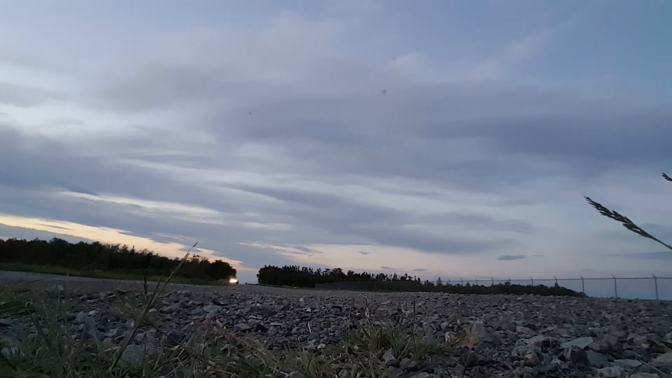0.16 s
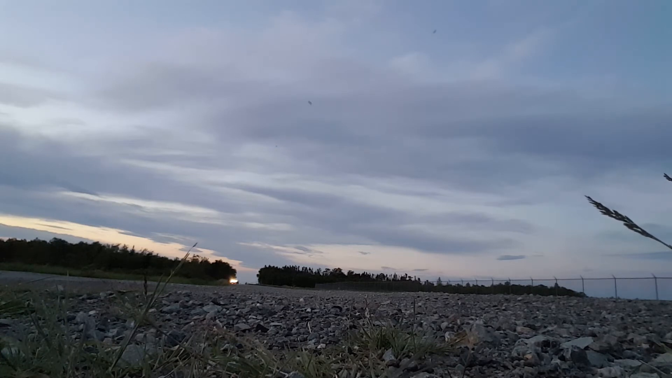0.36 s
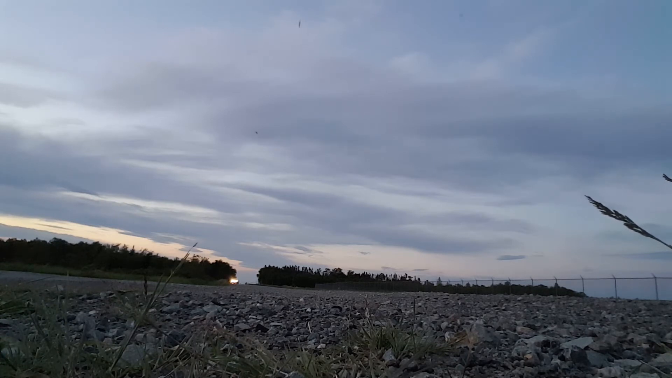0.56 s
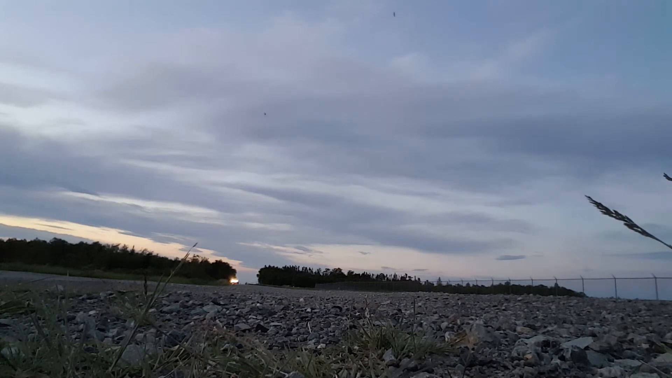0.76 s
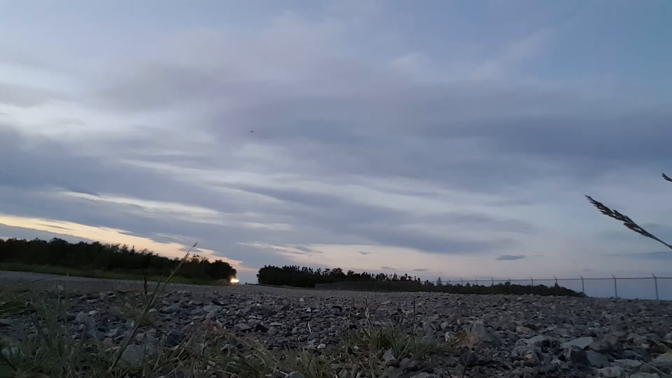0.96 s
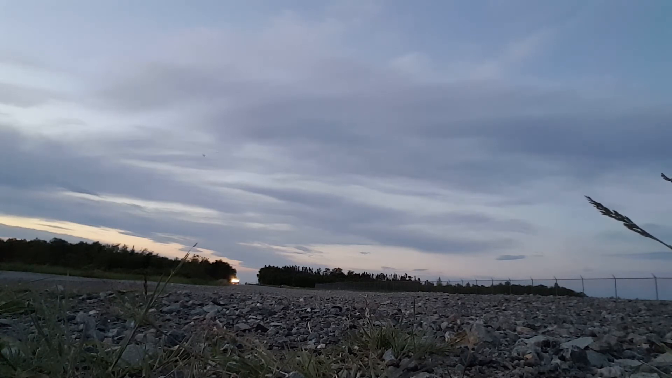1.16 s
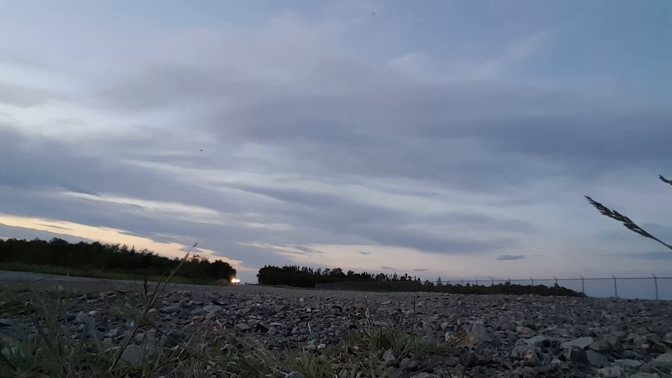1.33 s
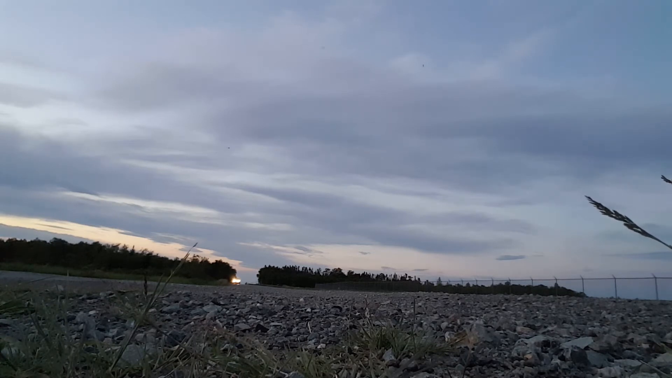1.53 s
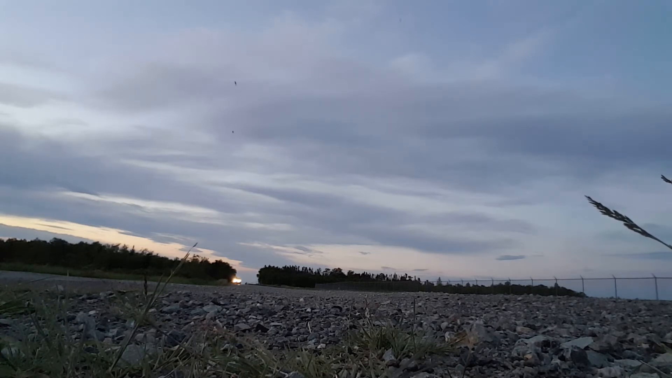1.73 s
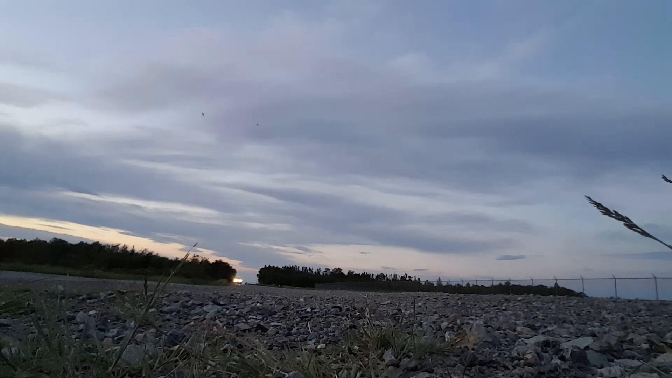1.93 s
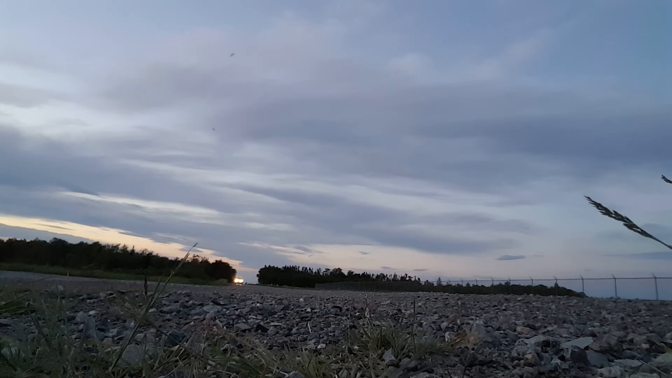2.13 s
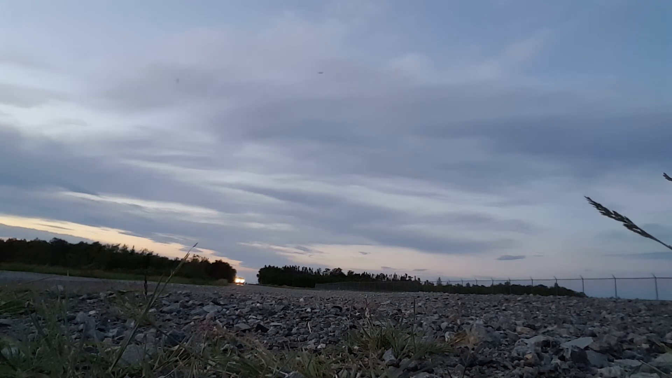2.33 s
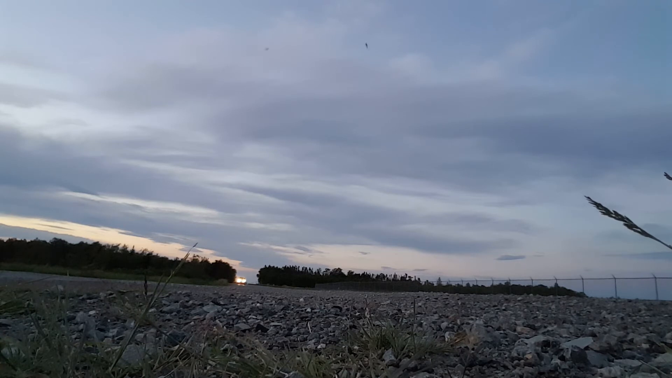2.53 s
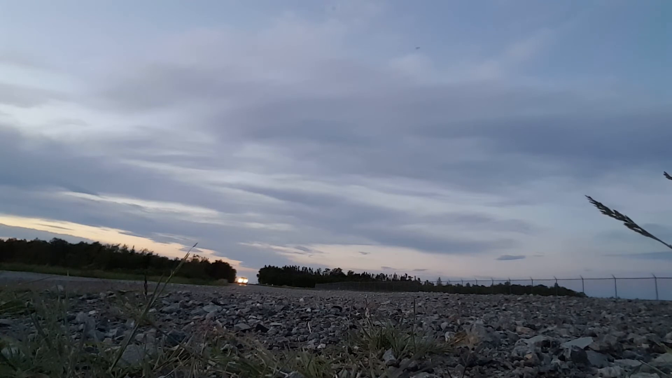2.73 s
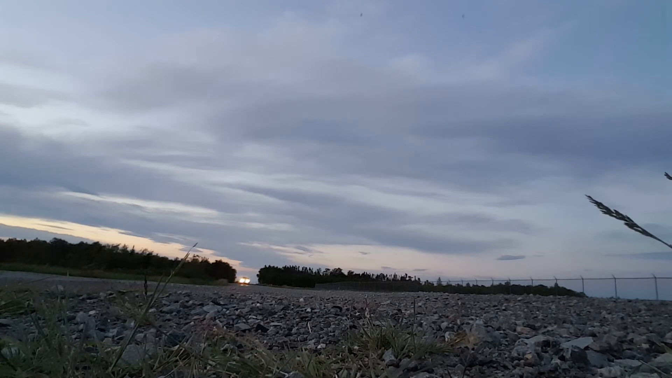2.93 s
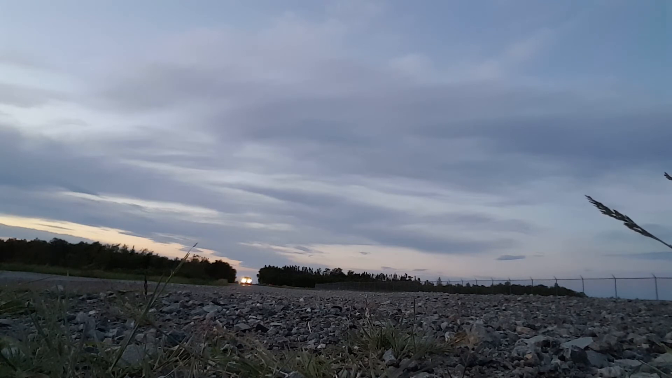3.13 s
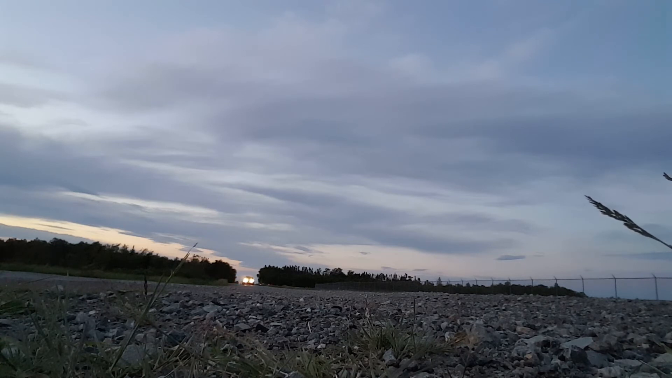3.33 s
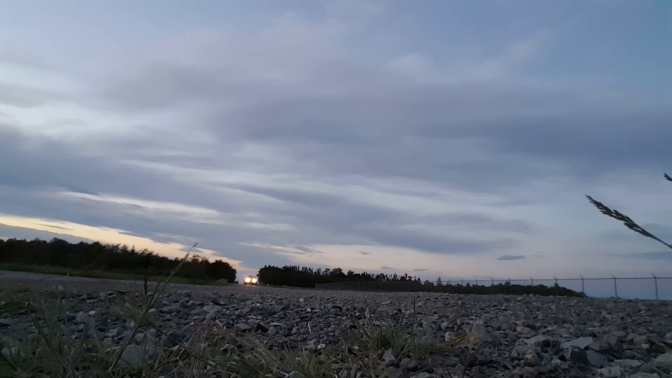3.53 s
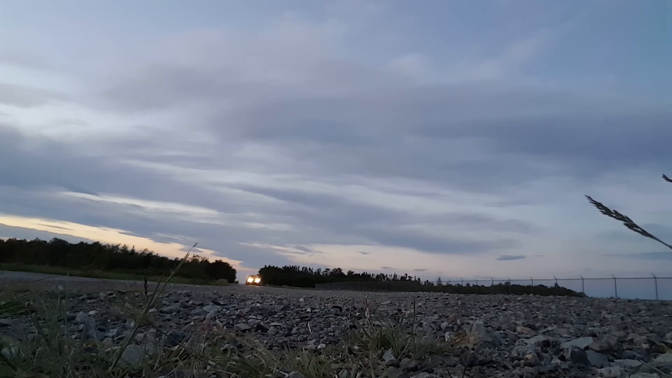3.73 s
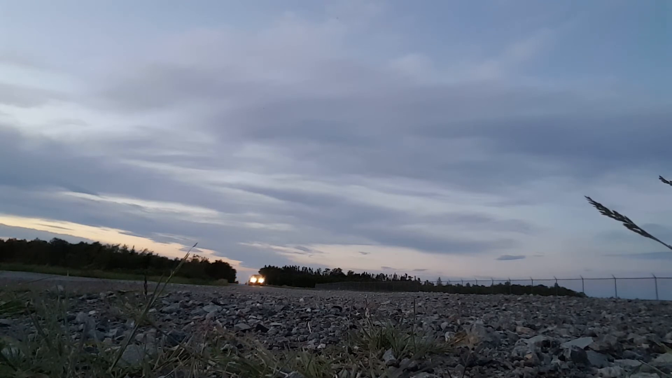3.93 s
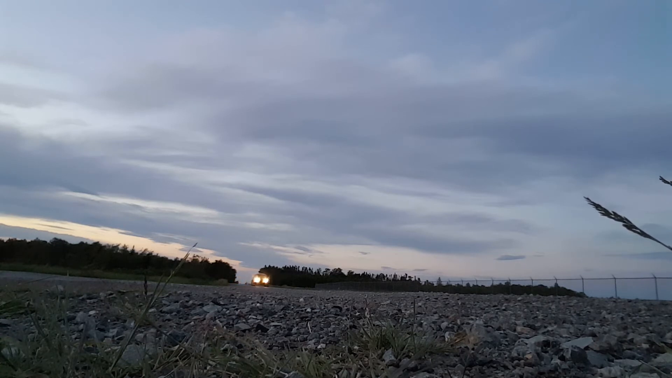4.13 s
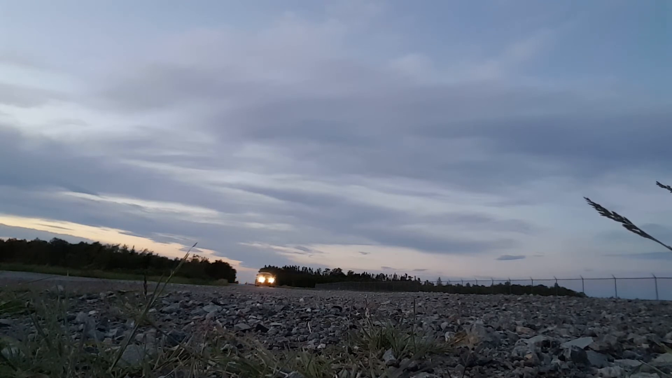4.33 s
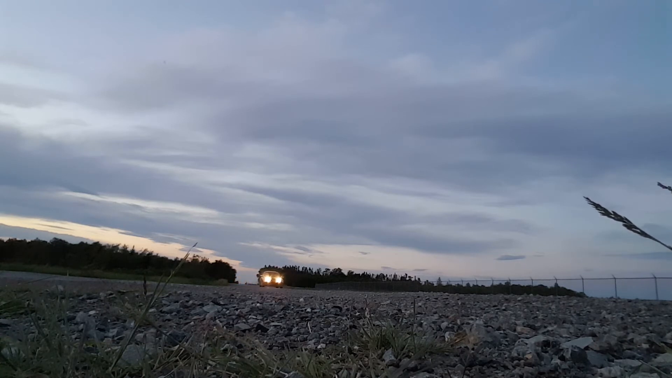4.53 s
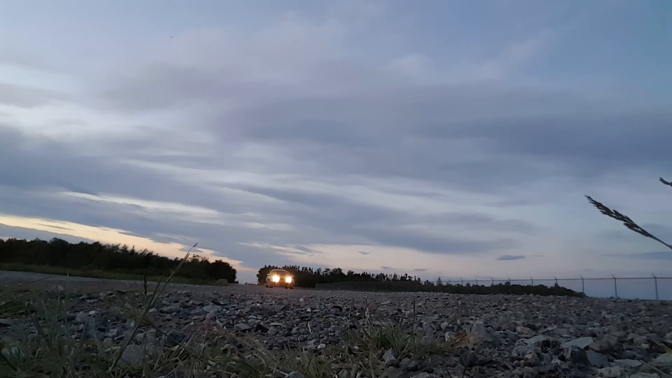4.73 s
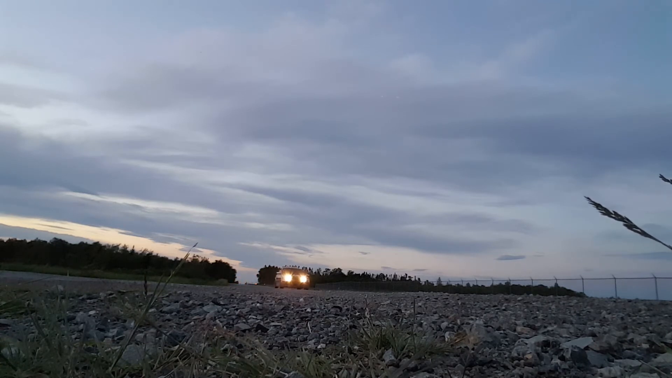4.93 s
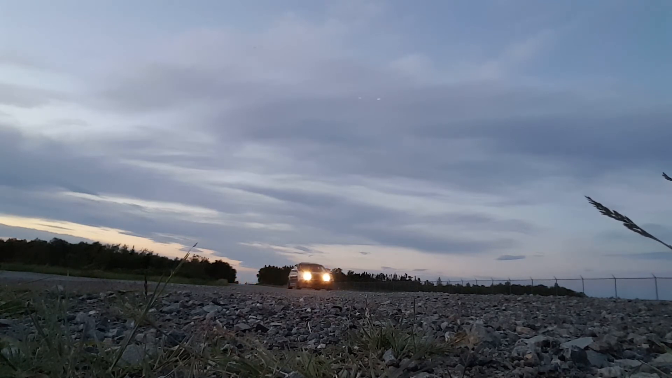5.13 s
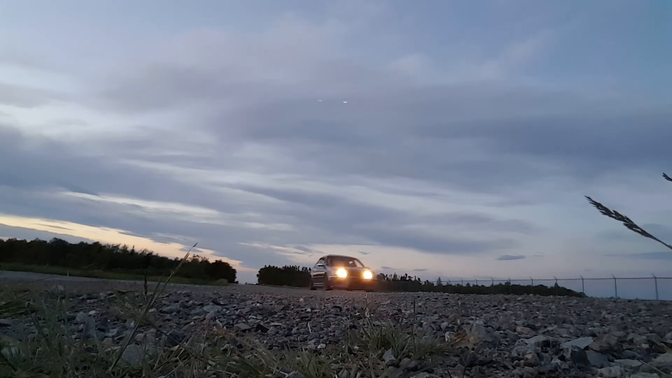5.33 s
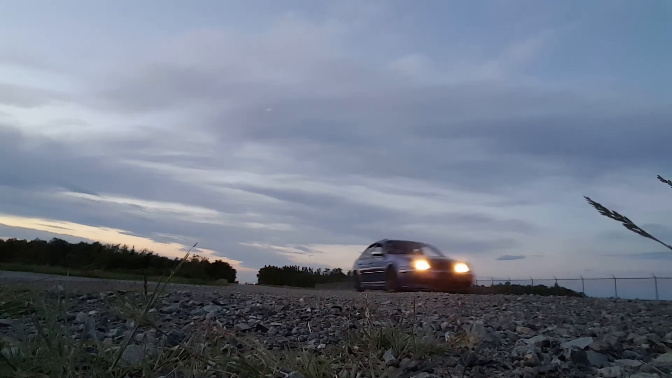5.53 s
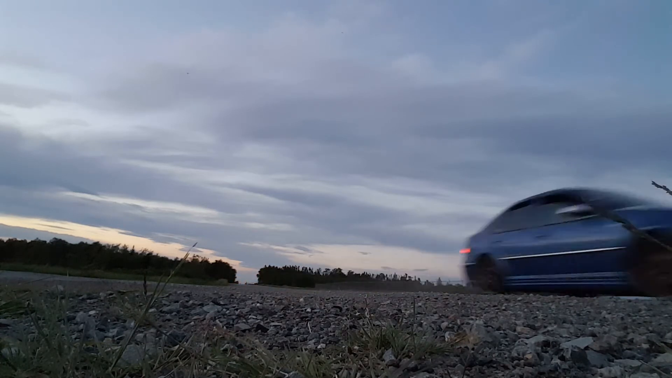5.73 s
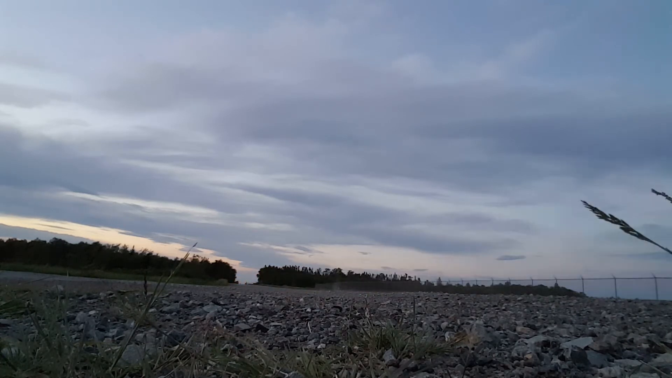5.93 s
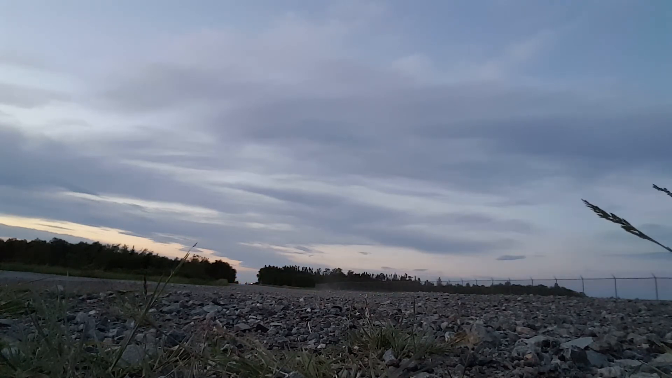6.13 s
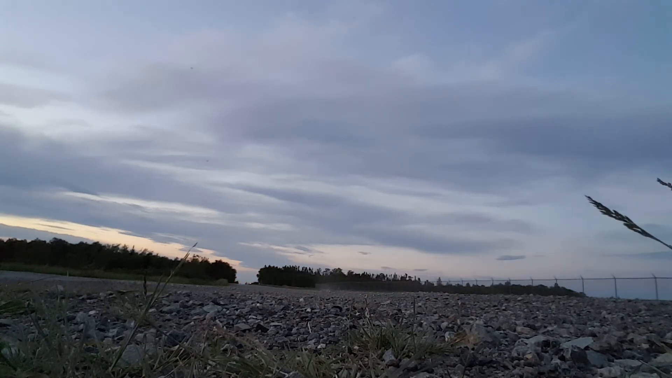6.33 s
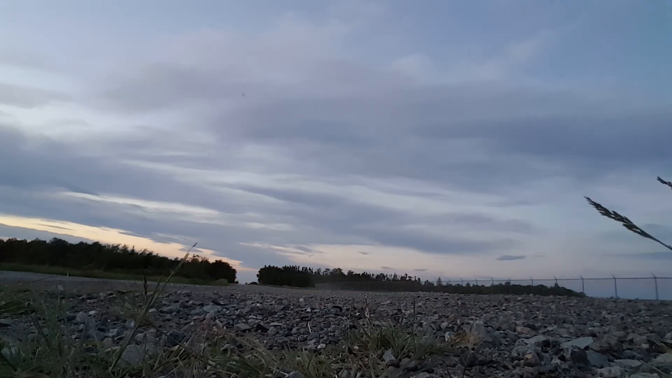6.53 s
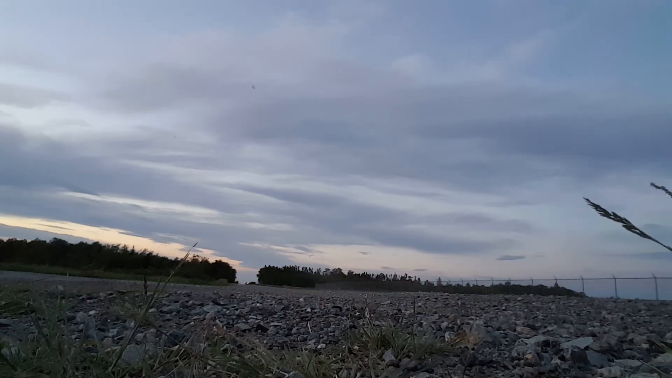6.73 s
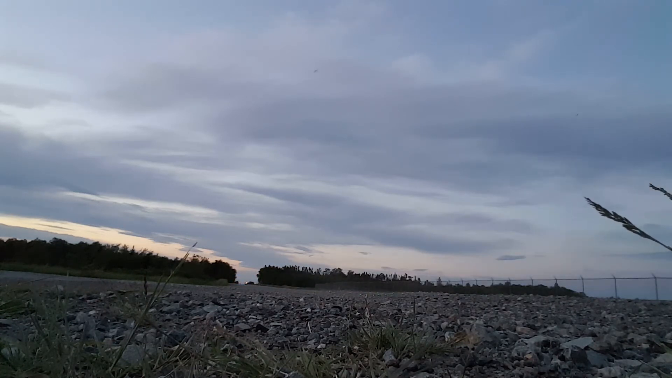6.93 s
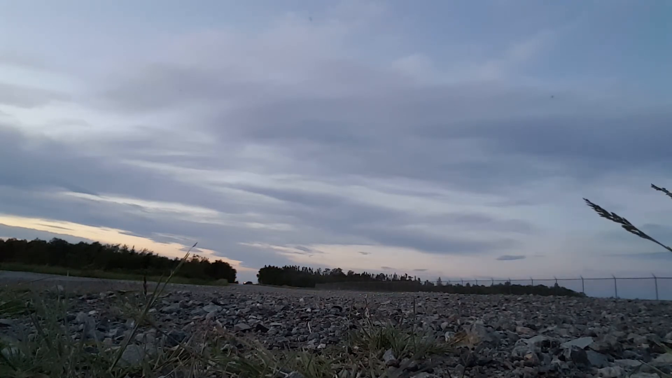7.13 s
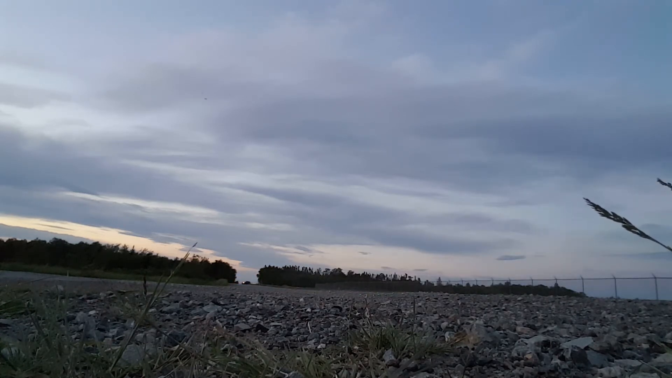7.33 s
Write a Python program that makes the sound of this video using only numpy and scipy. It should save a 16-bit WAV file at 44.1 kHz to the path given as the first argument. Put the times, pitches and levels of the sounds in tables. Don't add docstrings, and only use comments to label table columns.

```python
import sys
import numpy as np
from scipy import signal
from scipy.fft import rfft, irfft, next_fast_len
from scipy.io import wavfile
from scipy.ndimage import uniform_filter1d, map_coordinates

SR = 44100
rng = np.random.default_rng(int(sys.argv[2]) if len(sys.argv) > 2 else 0)


def master_out(mix):
    frames = np.transpose(np.atleast_2d(mix))
    ceiling = np.clip(frames, -1, 1)
    pcm = np.round(ceiling * 32767).astype(np.int16)
    wavfile.write(sys.argv[1], SR, pcm)


def amplitude_ratio(level_db):
    exponent = np.asarray(level_db, float) / 20
    return 10 ** exponent


N = 324576
TIME = np.arange(N) / SR

# (time [s], rate [Hz])
FIRING_RATE = [(0, 133.7), (1.66, 174.7), (2.3, 195.8), (2.91, 218.2), (3.52, 236.5), (3.65, 227.4),
               (3.92, 213.1), (4.02, 187.5), (4.1, 165.5), (4.26, 170.9), (5.1, 184.7), (5.7, 195.3),
               (5.95, 188.1), (6.12, 176.1), (6.29, 168.8), (6.96, 154.5), (7.1, 131), (7.36, 136.1)]
# (time [s], firing tone level [dB], second order level [dB])
FIRING_TONES = [(0, -59.5, -68), (.5, -44.5, -56.5), (1.0, -43, -53), (1.4, -47, -47.5),
                (1.75, -52.5, -51.5), (2.05, -45, -56), (2.55, -42.5, -67.5), (2.85, -34.5, -54),
                (3.55, -29.5, -50), (3.92, -30.5, -49.5), (4.4, -31, -42.5), (5.15, -33.5, -33.5),
                (5.4, -25.5, -21), (5.9, -11, -19.5), (6.26, -22, -19.5), (6.55, -17.5, -25),
                (6.9, -21.5, -25.5), (7.36, -16.5, -20.5)]
# (multiple of firing rate, level over uneven-cylinder level [dB])
QUARTER_ORDERS = [(.5, -11), (.75, -6), (1.25, -11), (1.5, -9), (1.75, 0), (2.25, -12), (2.5, -5),
                  (2.75, -4), (3.25, -14), (3.5, -11), (3.75, -11), (4.25, -15), (4.5, -17), (4.75, -16)]
# (multiple of firing rate, level over uneven-cylinder level [dB])
UPPER_ORDERS = [(4, -6), (5, -11), (6, -15)]
# (frequency [Hz], gain [dB])
PIPE_COLOUR = [(100, -3), (230, -6), (335, 4), (405, -10), (490, 0), (620, -3), (700, 1), (800, 8),
               (950, -4), (1200, -10)]
# (time [s], order, gain [dB], half width [s])
ORDER_DIPS_AND_SWELLS = [(3.72, 1, -3, .08), (4.08, 1, -7, .06), (5.84, 1, -6, .02), (5.945, 1, -15, .015),
                         (6.03, 1, -9, .025), (6.34, 1, -9, .04), (5.885, 2, -25, .025), (5.9, 3, -18, .03),
                         (6.37, 2, 7, .06), (6.9, 2, 9, .05), (6.975, 2, -10, .015), (7.03, 2, 7, .04),
                         (7.03, 1, -5, .04), (1.0, 3, 6, .35), (1.62, 3, 9, .12)]
# (shuts at [s], opens at [s])
SHIFTS = [
    (3.55, 4.24),
    (6.318, 6.894),
]
# (time [s], length [s], thump level [dB], boom level [dB])
OVERRUNS = [
    (3.604, 0.077, -43.5, -37),
    (6.295, 0.21, -17.5, -27),
]
# (frequency [Hz], width [Hz], level [dB])
TAILPIPE_RINGS = [(80., 40., -8), (123., 30., 0), (250., 120., -11), (410., 180., -14)]
# (frequency [Hz], density [dB/Hz])
BOOM_SPECTRUM = [(20, -41.5), (35, -7.5), (60, -1), (110, 4), (180, 4.5), (280, -2), (400, -20)]
# (frequency [Hz], density [dB/Hz])
RUSH_SPECTRUM = [(150, -22), (250, -5), (400, -2.5), (600, -5), (800, -6), (1100, -13)]
# (frequency [Hz], density [dB/Hz])
ROAR_SPECTRUM = [(500, -34.5), (750, -3), (1000, 1.5), (1300, 3.5), (1600, -3), (1900, -16), (2400, -34.5)]
# (frequency [Hz], density [dB/Hz])
SIZZLE_SPECTRUM = [(1300, -23.5), (1700, 4), (2000, 3), (2500, -7), (3000, -27.5), (3600, -38), (4500, -41),
                   (5500, -44)]
# (frequency [Hz], density [dB/Hz])
TREAD_SPECTRUM = [(1900, -29), (2300, -2), (2700, 2), (3100, -9), (3500, -16), (4000, -30.5)]
# (frequency [Hz], density [dB/Hz])
GRIT_SPECTRUM = [(2400, -32.5), (2900, 5), (3300, -3), (3900, -9), (4600, -10), (5300, -12), (6000, -23)]
# (frequency [Hz], density [dB/Hz])
HISS_SPECTRUM = [(5000, -26.5), (5700, -4.5), (6500, -4), (7900, -1), (8500, -4.5), (9300, -10.5),
                 (10500, -38)]
# (frequency [Hz], density [dB/Hz])
AIR_SPECTRUM = [(5650, -41.5), (9600, -13.5), (10900, -6), (13500, -4), (14800, -4.5), (16000, -4.5)]
# (time [s], frequency [Hz], level [dB])
TURBO_WHISTLE = [(4.3, 11750, -95), (4.72, 12390, -82), (4.95, 12280, -84), (5.14, 12000, -80),
                 (5.3, 11520, -72), (5.57, 11530, -59), (5.78, 11330, -53), (5.9, 10860, -50),
                 (6.0, 10150, -55)]
# (time [s], level [dB])
GEAR_WHINE = [(4.7, -94), (5.2, -80), (5.45, -75), (5.6, -80)]
# (frequency [Hz], density [dB/Hz])
FIELD_SPECTRUM = [(1470, -36), (2500, 2), (2940, -0.5), (3410, -2), (6810, -10.5), (7130, -11.5),
                  (8730, -12), (10400, -12.5), (15200, -7.5), (16000, -19)]
# (time [s], lag of the left port [samples])
BEARING = [(0, 5.7), (2.7, 4.7), (4.5, 2.8), (5.44, 0), (5.7, -4.3), (5.8, -8.5), (5.88, -15.5),
           (5.96, -20.3), (6.15, -17.8), (6.27, -15), (6.42, -13.1), (6.7, -12.2), (7.36, -11.8)]

ABREAST_S, CAR_LENGTH_S, TAILPIPE_LATE_S = 5.83, .09, .07
KERB_S, TURN_S = 0.13, 0.41
FAR_DB_PER_S = 2
CREST_S, CREST_WIDTH_S, CREST_DB = 2.6, 0.42, -8
SHUT_S, OPEN_S, HEARD_AHEAD = .12, 0.25, .15
THUMP_RISE_S, THUMP_SAG_DB_PER_S, THUMP_FALL_DB_PER_S = .018, -34.5, -260
SHADE_DB_PER_SAMPLE = .42
WHINE_ORDER = 36.6


def exhaust():
    firings = np.cumsum(curves(FIRING_RATE)[0]) / SR
    puffs = 1 + 0.26 * np.cos(2 * np.pi * firings)
    rush_db = passing(5.88, -20.5, 0.43, 4.48, .3, .3, -9, -49)
    rush = noise(RUSH_SPECTRUM, 1.5, 14) * puffs * amplitude_ratio(rush_db)
    boom_gain = amplitude_ratio(passing(5.84, -24.5, 0.44, 5.6, -10, .3, -.1, -43.5))
    boom_gain += sum(amplitude_ratio(db) * overrun(s, 0.54 * length_s) for s, length_s, _, db in OVERRUNS)
    boom = noise(BOOM_SPECTRUM, 1.2, 10) * boom_gain
    return crank_orders(firings) + overrun_thumps(firings) + rush + boom


def crank_orders(firings):
    hz = curves(FIRING_RATE)[0]
    uneven_db = passing(6.01, -25.5, 0.72, 1.14, 8.43, -2.5, -22.5, -54, 0.11)
    shut = lifted() * (TIME > ABREAST_S)
    first_db, second_db = curves(FIRING_TONES)
    first_db = first_db - 12 * shut + dips_and_swells_db(1)
    second_db = second_db - 15 * shut + dips_and_swells_db(2)
    ring_db = 16 * gone(ABREAST_S) / (1 + ((3 * hz - 400) / 55) ** 2)
    third_db = uneven_db - 4 - 8 * shut + ring_db + dips_and_swells_db(3)
    third_db += (2.5 * walk(4) - 4) * (1 - gone(5.9))
    hidden_db = np.interp(TIME, [ABREAST_S - 1, ABREAST_S], [-4, 0])
    pipe_hz, pipe_gain_db = np.transpose(PIPE_COLOUR)

    def tone(multiple, db, waver_db, drift_rad, start=0):
        angle = 2 * np.pi * (multiple * firings + start) + drift_rad * walk(12)
        return np.sqrt(2) * amplitude_ratio(db + waver_db * walk(18)) * np.cos(angle)

    def weak_db(multiple):
        colour_db = np.interp(np.log(multiple * hz), np.log(pipe_hz), pipe_gain_db)
        tilt_db = np.clip(4 * (multiple - 3), -7, 3) * gone(ABREAST_S, .1)
        return uneven_db + colour_db + (multiple > 2) * hidden_db + tilt_db

    out = tone(1, first_db, .8, .1) + tone(2, second_db, .9, .15) + tone(3, third_db, 1.1, .2, .4)
    out += sum(tone(k, db + weak_db(k), 2.2, .35) for k, db in UPPER_ORDERS)
    out += sum(tone(k, db + weak_db(k), 3.2, .4, rng.random()) for k, db in QUARTER_ORDERS)
    return out


def dips_and_swells_db(order):
    return sum(db * np.exp(-((TIME - s) / width_s) ** 2)
               for s, which, db, width_s in ORDER_DIPS_AND_SWELLS if which == order)


def overrun_thumps(firings):
    cycles = [np.floor((firings - firings[int(row[0] * SR)]) / 4) for row in OVERRUNS]
    first_kicks, second_kicks = np.diff(cycles, prepend=0).clip(0, 1)
    kicks = np.where(TIME < 5, first_kicks, second_kicks) * amplitude_ratio(2.8 * walk(40))
    kicks = signal.oaconvolve(kicks, np.hanning(140), "same")
    thumps = sum(amplitude_ratio(db) * signal.lfilter(*signal.iirpeak(hz, hz / width_hz, SR), kicks)
                 for hz, width_hz, db in TAILPIPE_RINGS)
    gain = sum(amplitude_ratio(db) * overrun(s, length_s) for s, length_s, db, _ in OVERRUNS)
    return thumps / thumps.std() * gain


def overrun(at_s, length_s):
    dt = TIME - at_s
    db = THUMP_SAG_DB_PER_S * dt + THUMP_FALL_DB_PER_S * np.clip(dt - length_s, 0, None)
    return np.clip(dt / THUMP_RISE_S, 0, 1) * amplitude_ratio(np.minimum(db, 0))


def tyres(wheels):
    roar_db = passing(5.753, -15, 0.38, 6.89, -14, 7.8, -.1, -55.5)
    sizzle_db = passing(5.796, -19, 0.51, 12.6, -9.5, 1.4, -.1, -62)
    tread_db = passing(5.754, -32.5, 0.68, 24.0, -13, 1.3, -.1, -96)

    def roar():
        return noise(ROAR_SPECTRUM, 0.68, 27) * amplitude_ratio(roar_db)

    def sizzle():
        return noise(SIZZLE_SPECTRUM, 0.91, 20) * amplitude_ratio(sizzle_db) + noise(TREAD_SPECTRUM, 0.98, 25) * amplitude_ratio(tread_db)

    mid_pan_db = -.4 + 4 * gone(5.75)
    aimed = ports(roar(), mid_pan_db, wheels) + ports(sizzle(), .4 * mid_pan_db, wheels)
    scattered = np.array([roar() + sizzle(), roar() + sizzle()])
    wide = scattered_share()
    return np.sqrt(1 - wide) * aimed + np.sqrt(wide) * scattered


def spray(wheels, high_pan_db):
    vent_db = 3 * np.exp(-((TIME - SHIFTS[-1][0]) / .07) ** 2)
    grit_db = passing(5.91, -45, 0.82, 24.0, -8, 7., -3.7, -93.5)
    hiss_db = passing(5.9, -41, 1.375, 9.5, -19.5, 13.0, -2.2, -79.5) + vent_db
    air_db = passing(5.875, -43.0, 1.45, 9.5, -10.5, 3., -4, -88.5) + vent_db

    def treble():
        grit = noise(GRIT_SPECTRUM, 0.72, 30) * amplitude_ratio(grit_db)
        hiss = noise(HISS_SPECTRUM, 0.95, 27) * amplitude_ratio(hiss_db)
        return grit + hiss + noise(AIR_SPECTRUM, .8, 25) * amplitude_ratio(air_db)

    wide = scattered_share()
    aimed = ports(treble(), high_pan_db, wheels) * np.sqrt(.35 * (1 - wide))
    return aimed + np.sqrt(1 + wide) * np.array([treble(), treble()]) * shade(high_pan_db)


def turbo():
    whistle_gain = burst([(s, db) for s, _, db in TURBO_WHISTLE]) * amplitude_ratio(2.5 * walk(70) + 2 * walk(12) - 2)
    whistle_hz = curves(TURBO_WHISTLE)[0] * (1 + .002 * walk(40) + .012 * walk(500))
    whistle = whistle_gain * np.sin(2 * np.pi * np.cumsum(whistle_hz) / SR)
    whine_hz = WHINE_ORDER * curves(FIRING_RATE)[0] * (1 + .006 * walk(300))
    whine_gain = burst(GEAR_WHINE) * amplitude_ratio(2.5 * walk(40))
    whine = whine_gain * np.sin(2 * np.pi * np.cumsum(whine_hz) / SR)
    return np.sqrt(2) * (whistle + whine)


def field():
    return np.array([noise(FIELD_SPECTRUM, .3, 8), noise(FIELD_SPECTRUM, .3, 8)]) * amplitude_ratio(-75)


def passing(at_s, peak_db, spread, coming_db_s, behind_db, going_db_s, lift_db, far_db, turn_s=TURN_S):
    dt = TIME - at_s
    db = peak_db - spread * 10 * np.log10(1 + (dt / KERB_S) ** 2)
    db += dt * np.where(dt < 0, coming_db_s, going_db_s)
    db += behind_db * gone(at_s, turn_s) + lift_db * lifted()
    db += CREST_DB * (1 - np.tanh((TIME - CREST_S) / CREST_WIDTH_S)) / 2
    murmur_db = far_db + FAR_DB_PER_S * np.minimum(dt, 0)
    return 10 * np.log10(amplitude_ratio(2 * db) + amplitude_ratio(2 * murmur_db))


def gone(at_s, turn_s=TURN_S):
    return 1 - np.exp(-np.clip(TIME - at_s, 0, None) / turn_s)


def lifted():
    shut = sum(np.clip(np.minimum((TIME - shut_s) / SHUT_S, 1 - (TIME - open_s) / OPEN_S), 0, 1)
               for shut_s, open_s in SHIFTS)
    return shut * np.where(TIME < ABREAST_S, HEARD_AHEAD, 1)


def scattered_share():
    return .015 + .5 * np.exp(-((TIME - ABREAST_S) / CAR_LENGTH_S) ** 2)


def ports(x, pan_db, lag, order=3):
    pair = [map_coordinates(x, [np.arange(N) - side * lag / 2], order=order, mode="mirror") for side in (1, -1)]
    return np.array(pair) * shade(pan_db)


def shade(pan_db):
    return amplitude_ratio(np.array([pan_db, -pan_db]) / 2)


def noise(spectrum, flicker_db, rate_hz):
    hz, db = np.transpose(spectrum)
    size = next_fast_len(N, real=True)
    f = np.maximum(np.arange(size // 2 + 1) * SR / size, 1)
    gain = amplitude_ratio(np.interp(np.log(f), np.log(hz), db, left=-120, right=-120))
    x = irfft(rfft(rng.standard_normal(size)) * gain, size)[:N] * amplitude_ratio(flicker_db * walk(rate_hz))
    return x / x.std()


def walk(rate_hz):
    k = int(SR / rate_hz)
    held = np.repeat(rng.standard_normal(N // k + 1), k)
    w = uniform_filter1d(uniform_filter1d(held, k), k)[:N]
    return w / w.std()


def curves(table):
    s, *columns = np.transpose(table)
    return [np.interp(TIME, s, c) for c in columns]


def burst(table):
    edge = np.clip(np.minimum(TIME - table[0][0], table[-1][0] - TIME) / .02, 0, 1)
    return edge * amplitude_ratio(curves(table)[0])


def scene():
    wheels = uniform_filter1d(curves(BEARING)[0], size=1500)
    tailpipe = 1.07 * np.interp(TIME - TAILPIPE_LATE_S, TIME, wheels)
    low_pan_db = .5 + .4 * gone(5.7)
    high_pan_db = SHADE_DB_PER_SAMPLE * np.clip(-wheels, 0, None)
    car = ports(exhaust(), low_pan_db, tailpipe, order=1) + tyres(wheels)
    car += spray(wheels, high_pan_db) + turbo() * shade(high_pan_db)
    return car + field()


def band_limit(x):
    return signal.sosfilt(signal.butter(12, 15800, fs=SR, output="sos"), x)


def record(dry):
    close = np.sin(np.pi / 2 * np.clip((N - np.arange(N)) / 25, 0, 1)) ** 2
    trimmed = signal.sosfilt(signal.butter(2, 45., "highpass", fs=SR, output="sos"), dry)
    return band_limit(close * np.tanh(0.87 * trimmed) / 0.83)


dry = scene()
out = record(dry)
master_out(out)
```